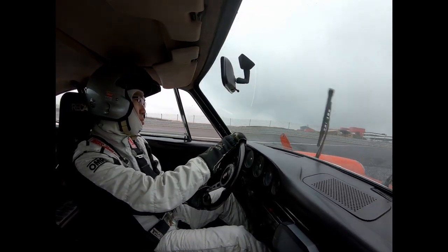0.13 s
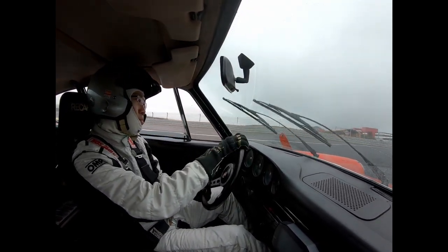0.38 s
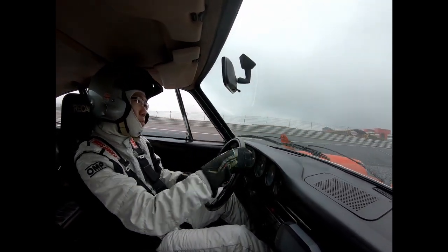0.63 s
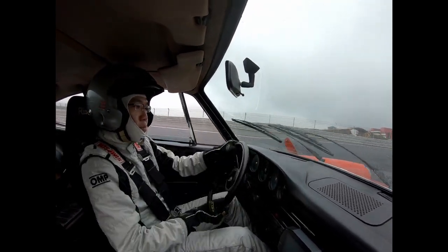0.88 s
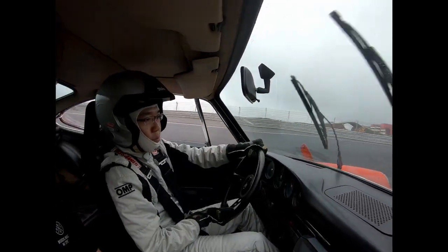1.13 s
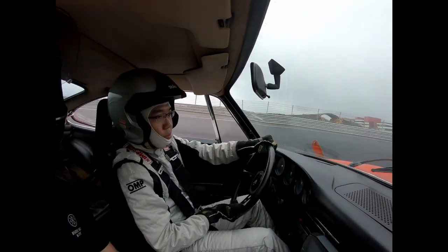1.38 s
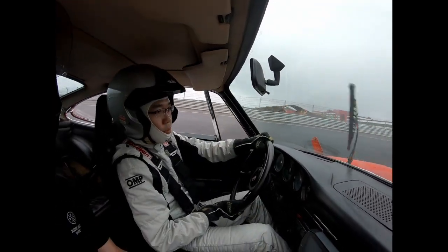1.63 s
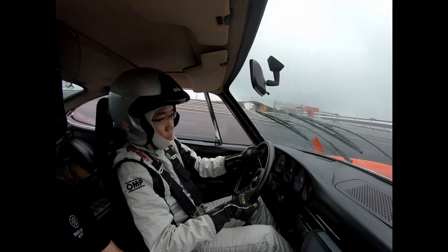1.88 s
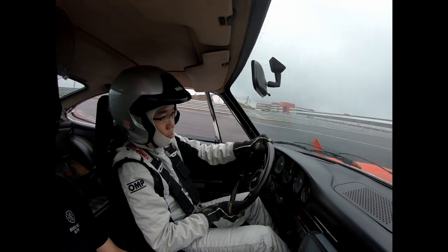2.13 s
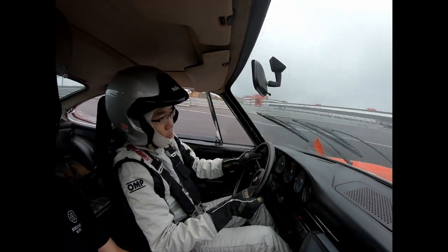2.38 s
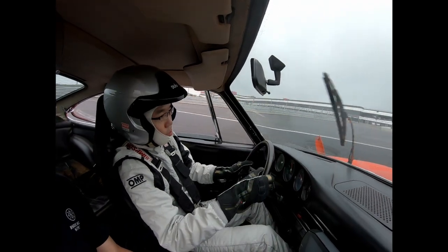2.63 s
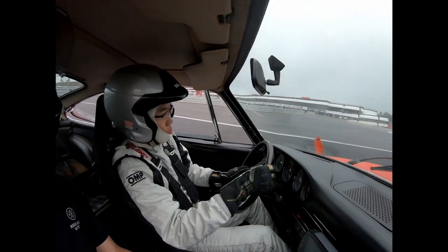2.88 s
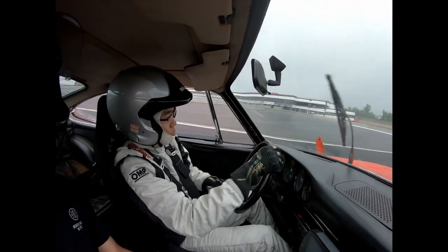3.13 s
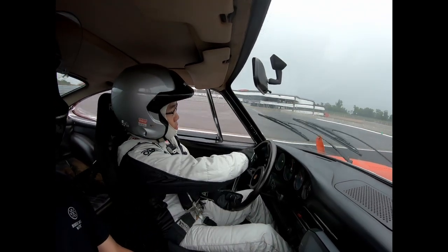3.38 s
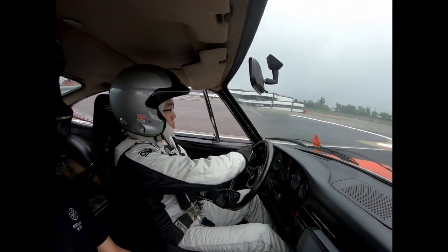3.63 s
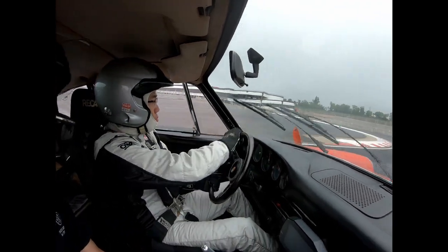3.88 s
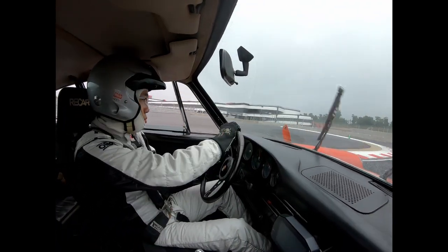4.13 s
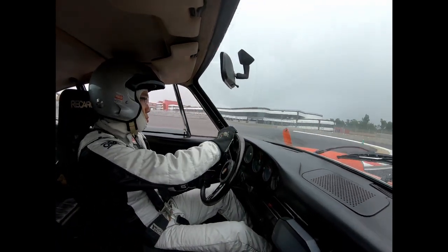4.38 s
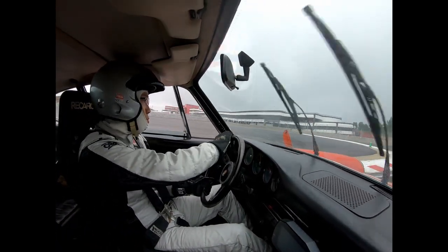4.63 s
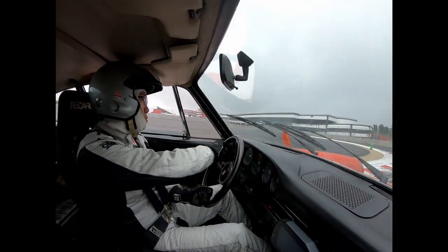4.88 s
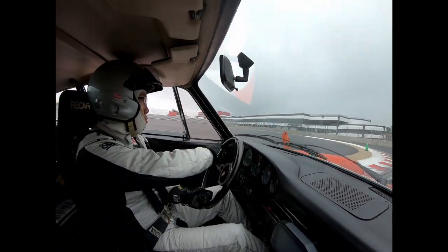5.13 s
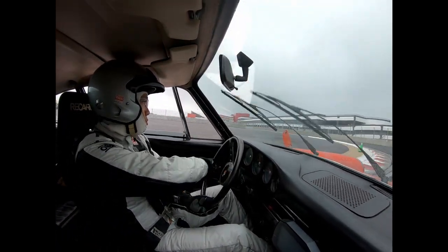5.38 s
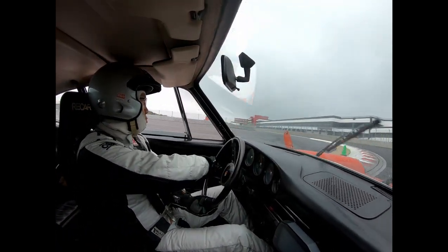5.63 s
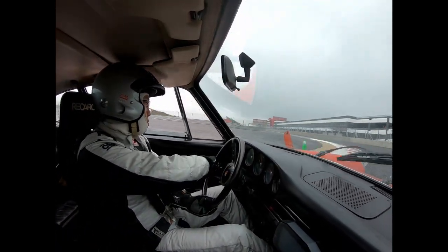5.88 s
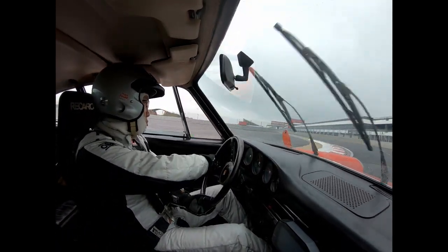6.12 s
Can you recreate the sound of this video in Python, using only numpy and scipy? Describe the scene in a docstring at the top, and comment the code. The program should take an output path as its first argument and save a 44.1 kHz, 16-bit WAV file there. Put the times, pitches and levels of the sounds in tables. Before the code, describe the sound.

Inside a stripped race car on a wet track, a six-cylinder engine dominates, with a low booming firing note and raspy exhaust growl. It holds nearly steady with a slight rise until about 0.7 s, then the growl falls away around 1 s with a lurch in pitch and a bump. A smoother hum sags in pitch; near 1.8-2.3 s the note weakens and deep cabin drone surges, with tiny grit cracks at 1.85 s. The boom returns by 2.5 s, growl builds from 2.8 s, and a heavy suspension thud lands at 3.1 s. Breathy intake roar peaks near 3.7 s. A fuller boom continues from 4 s, lurching and dropping lower at about 5.1 s, hollow and round, wobbling again at 5.5 s. Another bump comes near 5.85 s. Light trim ticks chatter, clearer early and late, over thin continuous spray and wind hiss. Close, boxy, bass-heavy microphone sound.

```python
"""Six-cylinder racer, bare cabin, wet track

Revs sag as the throttle opens and shuts. Sines at engine orders make the booming firing note and the growl;
filtered noise makes the gas rush, cabin drone, road thuds, floor-pan rumble and thin hiss of spray and wind.
Loose trim ticks as decaying sines; grit cracks as short noise bursts. One band-limited microphone hears it all."""
import sys
import numpy as np
from scipy import signal
from scipy.io import wavfile
from scipy.ndimage import uniform_filter1d, minimum_filter1d

SR = 44100
rng = np.random.default_rng(int(sys.argv[2]) if len(sys.argv) > 2 else 0)


def volts_from_db(level):
    """Convert decibel levels to linear amplitude ratios."""
    exponent = np.asarray(level, float) / 20
    return 10 ** exponent


def output_pcm(signal):
    """Save a mono or channel-first signal as 16-bit PCM at the path in sys.argv[1].

    Samples are clipped to [-1, 1] before scaling.
    """
    pcm = np.clip(np.atleast_2d(signal).T, -1, 1) * 32767
    wavfile.write(sys.argv[1], SR, np.round(pcm).astype(np.int16))


N = 275625

# firing rate before lurches: time_s, firing_hz
FIRING_RATE = [(0.0, 184.0), (0.25, 184.8), (0.7, 188.3), (1.0, 184.8), (1.25, 183.6), (1.75, 175.4),
               (2.0, 172.0), (2.35, 164.3), (2.62, 171.2), (2.8, 168.8), (3.13, 170.7), (3.5, 169.6),
               (3.75, 166.5), (4.0, 159.6), (4.4, 164.8), (4.65, 165.9), (4.89, 164.9), (5.125, 151.5),
               (5.375, 149.2), (5.52, 151.4), (5.875, 150.3), (6.25, 152.0)]
# firing-note swings as the drivetrain lurches on and off load: centre_s, swing_hz
LURCHES = [(.97, -14), (1.06, -16.5), (2.211, -14), (2.66, 4), (2.7, -5.5), (5.03, 7.5), (5.08, -12.5),
           (5.13, 6), (5.51, -10), (5.56, 12.5)]
# brief changes of the firing note, mostly dips: centre_s, change_db
NOTE_DIPS = [(1.01, 1.5), (2.7, -1), (5.04, -7), (5.12, -4.5), (5.54, -4), (5.84, -2)]
# engine levels before waver, bank share and pipe response: time_s, note_db, middle_orders_db, growl_db
ENGINE_LEVELS = [(0, -15, -35.5, -14.5), (0.3, -17.5, -31.5, -14), (0.66, -23.5, -34, -13.5),
                 (0.84, -15.5, -54, -15), (0.95, -11, -56, -26), (1.12, -11.5, -54, -46),
                 (1.4, -14, -41.5, -52), (1.8, -12.5, -41, -44), (1.95, -23.5, -56, -49),
                 (2.18, -23, -51, -62.5), (2.3, -17, -49, -62), (2.45, -9, -54, -55), (2.56, -9, -32, -42),
                 (2.72, -11.5, -35, -49), (2.82, -11.5, -27.5, -30), (3.0, -13, -27.5, -28),
                 (3.1, -11, -28.5, -21), (3.55, -11.5, -23, -22.5), (3.8, -11, -25.5, -28.5),
                 (3.98, -8, -23, -39.5), (4.25, -8.5, -27, -34), (4.36, -8.5, -27.5, -26.5),
                 (4.89, -9, -22.5, -24), (4.98, -6.5, -27, -35.5), (5.15, -9.5, -35, -49.5),
                 (5.5, -11, -34, -61.5), (5.6, -7, -34, -50), (5.87, -8, -30.5, -43.5),
                 (6.25, -8, -43.5, -38.5)]
# fifth engine order, gas rush and intake roar levels before waver: time_s, fifth_order_db, rush_db, roar_db
FIFTH_AND_GAS_LEVELS = [(0, -21.5, -40, -51), (0.85, -26, -30, -46.5), (0.95, -17, -29, -43),
                        (1.07, -14, -34.5, -41), (1.2, -35, -38, -40), (1.5, -22.5, -38, -45.5),
                        (2.1, -24, -50, -51), (2.4, -19.5, -46, -53), (2.7, -22, -34, -47),
                        (2.9, -25, -29, -48), (3.2, -22, -28.5, -44), (3.4, -22, -32.5, -37),
                        (3.66, -22, -32, -31.5), (3.84, -23.5, -30, -36), (3.9, -30, -35, -53),
                        (4.2, -32.5, -34, -43.5), (4.9, -30.5, -34, -44.5), (5.3, -42, -47, -51),
                        (5.7, -38, -41, -50), (5.88, -34.5, -30.5, -54), (6.0, -41.5, -38.5, -56),
                        (6.25, -37, -44.5, -56)]
# rocking orders passed on through the mounts: order_per_cycle, db_re_thud
ROCKING_ORDERS = [(1, -6), (3, -8)]
# exhaust and cabin response to the upper orders: freq_hz, gain_db
PIPE_RESPONSE = [(200, -2), (250, -4.5), (280, -11.5), (310, -13), (335, 0), (372, 0.5), (415, -10),
                 (465, -0.5), (500, -2), (560, -7.5), (596, -10.5), (640, -27.5), (750, -28), (850, -27.5),
                 (935, -26), (1000, -32), (1120, -40)]
# gas rush resonances in pipe and intake: centre_hz, pole_width_hz, relative_db
RUSH_BANDS = [(348, 75, -3.5), (475.5, 121, 1.5)]
# intake roar resonances: centre_hz, pole_width_hz, relative_db
ROAR_BANDS = [(738, 230, -7.5), (972.5, 51, -7.5)]
# road levels before waver and bumps: time_s, drone_db, thud_db, pan_db
ROAD_LEVELS = [(0, -16, -22.5, -21.5), (0.7, -20, -24.5, -29.5), (1.1, -20, -21, -26),
               (1.4, -18.5, -20, -30), (1.57, -14, -21.5, -28), (1.79, -17.5, -22.5, -22),
               (1.84, -3, -27, -20.5), (2.03, -11.5, -24.5, -35), (2.19, -5, -21, -34),
               (2.27, -16.5, -22.5, -28.5), (2.55, -17, -34, -29.5), (2.9, -11.5, -28.5, -28),
               (3.35, -17.5, -29.5, -27), (3.5, -11, -24, -31), (3.6, -8, -25, -35),
               (3.75, -14, -26.5, -29.5), (3.86, -18, -26.5, -30.5), (4.05, -19.5, -26.5, -28),
               (4.2, -26, -30.5, -25), (4.6, -20, -40, -28.5), (5.0, -21.5, -35, -27.5),
               (5.1, -18.5, -26.5, -27), (5.2, -18.5, -29, -30.5), (5.5, -16.5, -32, -25),
               (5.85, -25.5, -34.5, -30.5), (6.25, -22.5, -41, -28.5)]
# bumps that jolt the suspension: centre_s, thud_rise_db
ROAD_BUMPS = [(0.66, 2.5), (0.98, 11), (1.21, 4.5), (2.0, 10), (3.07, 19.5), (3.89, 4.5), (5.85, 11)]
# clearest trim knocks: start_s, level_db
TRIM_KNOCKS = [(0.1067, -30), (0.196, -32), (1.6297, -40), (1.7475, -41), (2.2247, -34.5), (2.461, -35.5),
               (2.5801, -38), (3.2217, -38), (4.2677, -37), (4.512, -43), (5.3765, -34.5), (5.494, -36),
               (5.556, -32.5), (5.76, -47), (5.8053, -28.5), (6.063, -40), (6.0977, -41)]
# least level of the fainter chatter: time_s, floor_db
CHATTER_FLOOR = [(0, -42.5), (1, -52), (3.9, -54), (4.3, -44.5), (6.25, -49)]
# trim modes: freq_hz, gain_db, t60_s
TRIM_MODES = [(1254, -1.5, 0.037), (1300, -4.5, 0.016), (2400, -13, .015)]
# spray and wind levels: time_s, relative_db, tilt_db_per_octave (above 2 kHz)
SPRAY_LEVELS = [(0, -45, 0.6), (.6, -43.5, 1.2), (1.05, -43, 1.4), (1.5, -44.5, 0.3), (1.87, -43, -0.9),
                (2.2, -47.5, -0.8), (2.7, -47, 0.3), (3.3, -48, 1.9), (4.0, -50.5, 1), (4.7, -48, 0.4),
                (5.1, -50.5, 0), (5.55, -49, 0), (6.25, -50, -1.5)]
# spray and wind spectrum: freq_hz, relative_db_per_hz
HISS_SPECTRUM = [(250, -5), (400, -5), (600, -6.5), (900, -14), (1100, -23), (1300, -16.5), (1900, -18.5),
                 (2600, -24), (4300, -28.5), (5300, -27.5), (7000, -37), (9000, -49.5), (12000, -68)]
# puddles lifting the spray: centre_s, rise_db
PUDDLES = [(0.98, 2), (1.13, 2.5), (1.86, 2.5), (2.61, 3), (3.33, 1.5), (3.9, 1.5), (4.69, 0.5)]
# grit against the floor: start_s, relative_db
GRIT_HITS = [(1.834, -31), (1.8444, -31), (1.865, -33)]


def set_rms(x, rms_db):
    """Scale to an rms level."""
    return x * volts_from_db(rms_db) / np.sqrt(np.mean(x ** 2))


def resonance(x, centre_hz, pole_width_hz):
    """Steep resonance: a two-pole band-pass applied twice."""
    b, a = signal.iirpeak(centre_hz, centre_hz / pole_width_hz, fs=SR)
    once = signal.lfilter(b, a, x)
    return signal.lfilter(b, a, once)


def walk(rate_hz):
    """Random levels held 1 / rate_hz and smoothed twice; spread near 1."""
    hold = int(SR / rate_hz)
    steps = np.repeat(rng.standard_normal(N // hold + 1), hold)
    return 1.08 * uniform_filter1d(uniform_filter1d(steps, hold), hold)[:N]


def curves(table):
    """Columns of a time table, interpolated to one value a sample."""
    time_s, *columns = np.transpose(table)
    return [np.interp(np.arange(N) / SR, time_s, c) for c in columns]


def response_db(points, hz):
    """Read (Hz, dB) points on a log-frequency axis."""
    freq_hz, db = np.transpose(points)
    return np.interp(np.log(hz), np.log(freq_hz), db)


def pulses(table, half_s):
    """Sum of bell curves of the given sizes, falling to 1/e at half_s from centre."""
    t = np.arange(N) / SR
    return sum(size * np.exp(-((t - centre_s) / half_s) ** 2) for centre_s, size in table)


def road():
    """Drone, thud and pan levels in dB: the surface is patchy and bumps jolt the thud."""
    drone_db, thud_db, pan_db = curves(ROAD_LEVELS)
    drone_db = drone_db + 1.5 * walk(13)
    thud_db = thud_db + pulses(ROAD_BUMPS, half_s=0.03) + 2.1 * walk(9)
    return drone_db, thud_db, pan_db + 2.4 * walk(20)


def order(cycle_rad, count, db, waver_db, slip_rad):
    """One engine order: a sine whose size and phase waver with uneven burning."""
    size = np.sqrt(2) * volts_from_db(db + waver_db * walk(14))
    start_rad = 2 * np.pi * rng.random()
    return size * np.sin(count * cycle_rad + slip_rad * walk(9) + start_rad)


def upper_orders(cycle_rad, firing_hz, middle_db, growl_db):
    """Orders 7 to 36, shared by both banks, one bank or single cylinders, shaped by the pipe."""
    both_db, bank_db, single_db = -0.5, -0.63, -14.5
    out = 0
    for k in range(7, 37):
        if k % 6 == 0:
            share_db = both_db
        elif k % 3 == 0:
            share_db = bank_db
        else:
            share_db = single_db
        if k < 14:
            load_db = middle_db
        elif k < 21:
            load_db = growl_db
        else:
            load_db = (middle_db + growl_db) / 2
        db = load_db + share_db + response_db(PIPE_RESPONSE, firing_hz * k / 6)
        out = out + order(cycle_rad, k, db, waver_db=0.7, slip_rad=0.06)
    return out


def gas(cycle_rad, rush_db, roar_db):
    """Gas leaves each bank in puffs: resonant noise throbbing at half the firing rate."""
    puffs = rng.standard_normal(N) * (1 + 0.099 * np.cos(cycle_rad * 3))
    rush = sum(set_rms(resonance(puffs, hz, width_hz), db) for hz, width_hz, db in RUSH_BANDS)
    roar = sum(set_rms(resonance(puffs, hz, width_hz), db) for hz, width_hz, db in ROAR_BANDS)
    return volts_from_db(rush_db + 1.1 * walk(11)) * rush + volts_from_db(roar_db + 3.2 * walk(15)) * roar


def engine(thud_db):
    """Six firings a cycle: firing note, fifth order, lumpy low orders, load-driven upper orders, gas."""
    firing_hz, = curves(FIRING_RATE)
    note_db, middle_db, growl_db = curves(ENGINE_LEVELS)
    fifth_db, rush_db, roar_db = curves(FIFTH_AND_GAS_LEVELS)
    cycle_rad = 2 * np.pi * np.cumsum(firing_hz / 6) / SR
    swing_hz = pulses(LURCHES, half_s=0.025)
    lurched_rad = cycle_rad + 2 * np.pi * np.cumsum(swing_hz / 6) / SR
    note_db = note_db + pulses(NOTE_DIPS, half_s=0.02)
    out = order(lurched_rad, 6, note_db, waver_db=0.82, slip_rad=0.14)
    # beats against the note about once a cycle
    out = out + order(cycle_rad, 5, fifth_db, waver_db=4.5, slip_rad=0.5)
    for k, db in ROCKING_ORDERS:
        out = out + order(cycle_rad, k, thud_db + db, waver_db=3.5, slip_rad=0.64)
    out = out + upper_orders(cycle_rad, firing_hz, middle_db, growl_db)
    return out + gas(cycle_rad, rush_db, roar_db)


def shell(drone_db, thud_db, pan_db):
    """The road shakes the body: air-cavity drone, deep sway, suspension thuds, floor-pan rumble."""
    push = rng.standard_normal((4, N))
    drone = resonance(push[0], centre_hz=52.8, pole_width_hz=12)
    # the cavity is kept ringing, so its level wavers less than free noise
    power = uniform_filter1d(drone ** 2, int(0.023 * SR))
    drone = drone / (power + 0.046 * np.mean(drone ** 2)) ** 0.36
    sway = resonance(push[3], centre_hz=44, pole_width_hz=30)
    thud = resonance(push[1] * volts_from_db(1.5 * walk(12)), centre_hz=100, pole_width_hz=62)
    pan = resonance(push[2] * volts_from_db(1.6 * walk(13)), centre_hz=199, pole_width_hz=52.6)
    out = volts_from_db(drone_db) * set_rms(drone, -1.7)
    out = out + volts_from_db(0.6 * (drone_db + thud_db)) * set_rms(sway, -4.5)
    out = out + volts_from_db(thud_db) * set_rms(thud, -1.5)
    return out + volts_from_db(pan_db) * set_rms(pan, 1.6)


def rattle():
    """Loose trim rings its modes at listed knocks and at random fainter chatter."""
    chatter_per_s, attack_s = 90, 0.0014
    start_s, db = np.transpose(TRIM_KNOCKS)
    chatter_db = curves(CHATTER_FLOOR)[0] + 2.5 * rng.exponential(size=N)
    knocks = (rng.random(N) < chatter_per_s / SR) * volts_from_db(chatter_db)
    knocks[(start_s * SR).astype(int)] = volts_from_db(db)
    t = np.arange(2400) / SR
    ring = 0
    for hz, gain_db, t60_s in TRIM_MODES:
        ring = ring + volts_from_db(gain_db) * np.sin(2 * np.pi * hz * t) * np.exp(-np.log(1000) * t / t60_s)
    return signal.fftconvolve(knocks, ring * (1 - np.exp(-t / attack_s)))[:N]


def spray():
    """Tyre spray and wind: noise bands flickering together and alone, roughened by droplets."""
    shared_flicker_db, own_flicker_db = 0.4, 0.8
    hiss_db, tilt_db = curves(SPRAY_LEVELS)
    shared = walk(25)
    grain_db = 3.9 * np.minimum(rng.exponential(size=N // 128 + 1), 4.5)
    grains = volts_from_db(grain_db).repeat(128)[:N]
    out = 0
    for hz in 280 * 2 ** np.arange(0, 5.5, 1 / 4):
        noise = rng.standard_normal(N) * (1 + 0.14 * grains)
        band_db = response_db(HISS_SPECTRUM, hz) + 10 * np.log10(hz)  # bandwidth grows with hz
        flicker_db = shared_flicker_db * shared + own_flicker_db * walk(8.2)
        bright_db = tilt_db * max(np.log2(hz / 2000), 0)
        out = out + set_rms(resonance(noise, hz, hz / 4), band_db) * volts_from_db(flicker_db + bright_db)
    return volts_from_db(hiss_db + pulses(PUDDLES, half_s=0.018)) * set_rms(out, 7.93)


def grit():
    """Each stone is a few milliseconds of bright, decaying noise."""
    decay_s = 0.0021
    t = np.arange(400) / SR
    out = np.zeros(N + len(t))
    for start_s, db in GRIT_HITS:
        start = int(start_s * SR)
        crack = rng.standard_normal(len(t)) * np.exp(-t / decay_s)
        out[start:start + len(t)] += volts_from_db(db + 1.0) * crack
    return resonance(resonance(out[:N], 3300, 4000), 3300, 4000)


def scene():
    """Sum of all sources at one microphone."""
    drone_db, thud_db, pan_db = road()
    out = engine(thud_db) + shell(drone_db, thud_db, pan_db)
    return (out + rattle() + spray() + grit())[None]


def low_pass(x):
    """Removes everything above the highest recorded frequency."""
    return signal.sosfilt(signal.butter(12, 15710, fs=SR, output="sos"), x)


def record(dry):
    """The microphone loses deepest bass and top; a limiter eases the loudest stretches down."""
    window, ceiling = int(0.06 * SR), 0.94
    x = signal.sosfilt(signal.butter(2, 22, "highpass", fs=SR, output="sos"), dry)
    x = signal.sosfilt(signal.butter(5, 11300, fs=SR, output="sos"), x)
    peak = -minimum_filter1d(-np.abs(x[0]), window)  # sliding maximum
    gain = uniform_filter1d(np.minimum(1, ceiling / peak), window)
    return low_pass(x * gain)


dry = scene()
out = record(dry)
output_pcm(out)
```